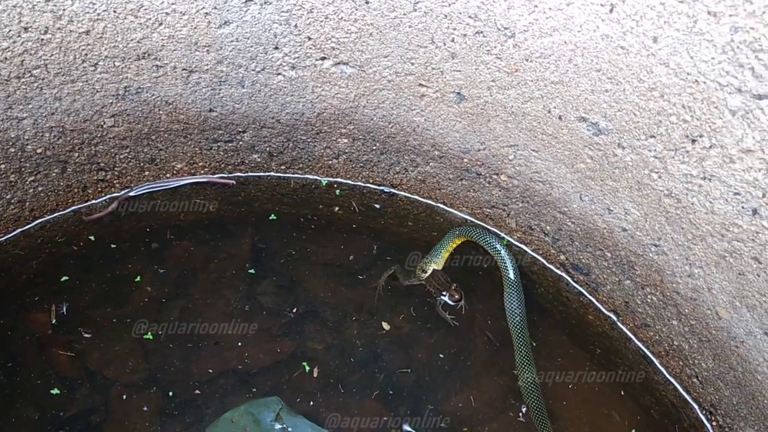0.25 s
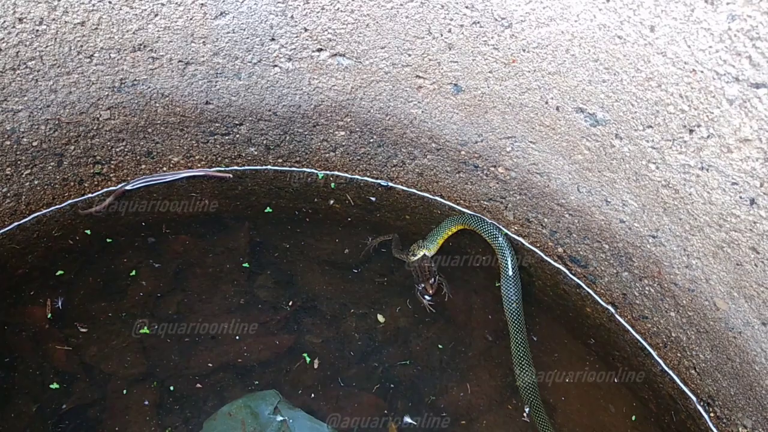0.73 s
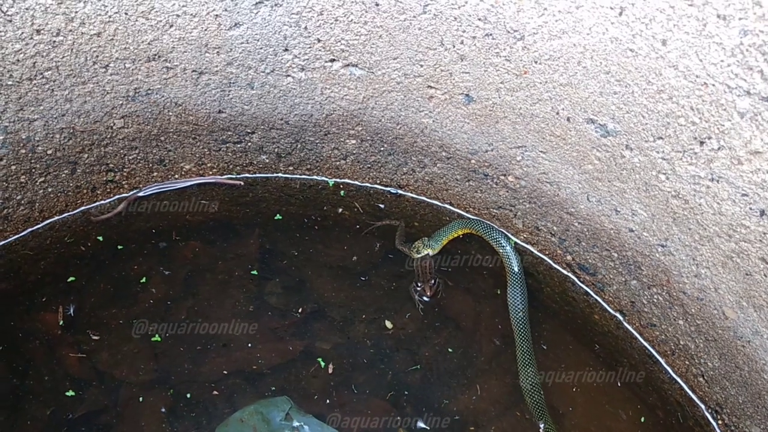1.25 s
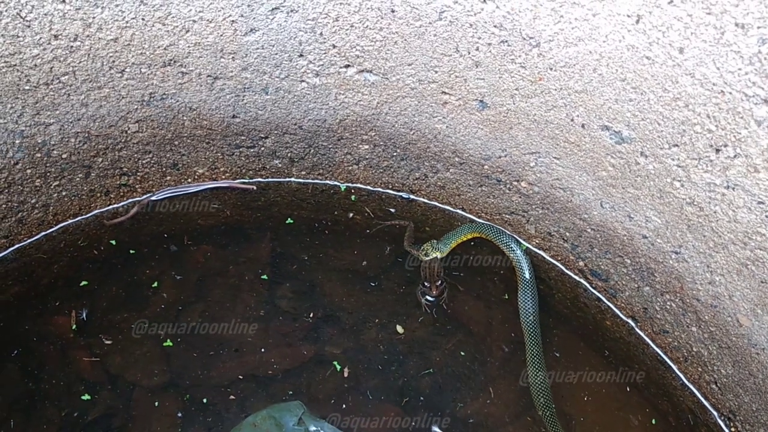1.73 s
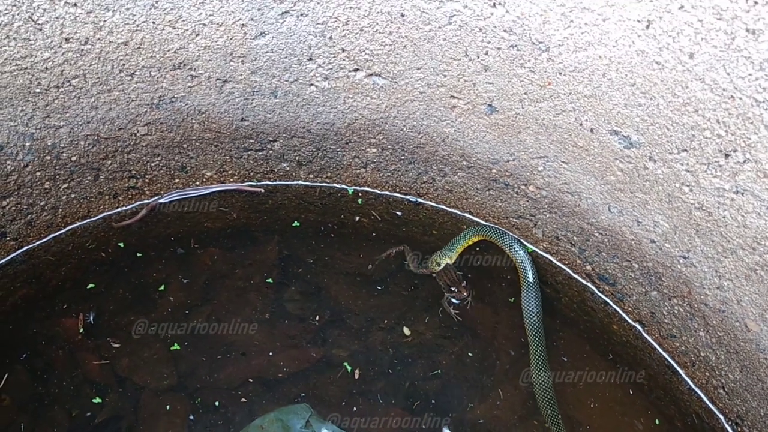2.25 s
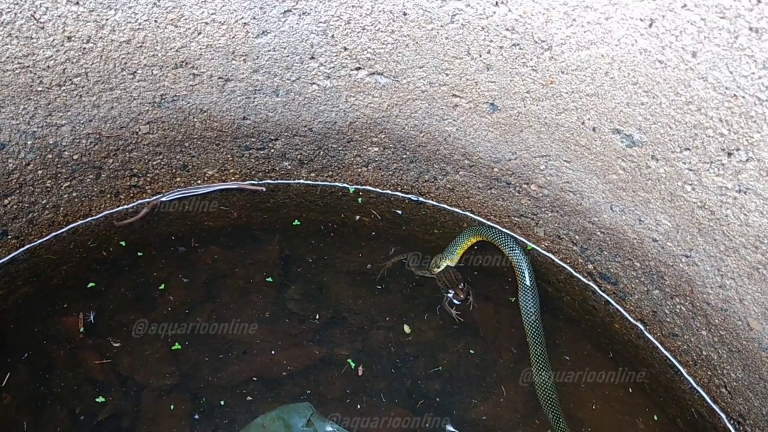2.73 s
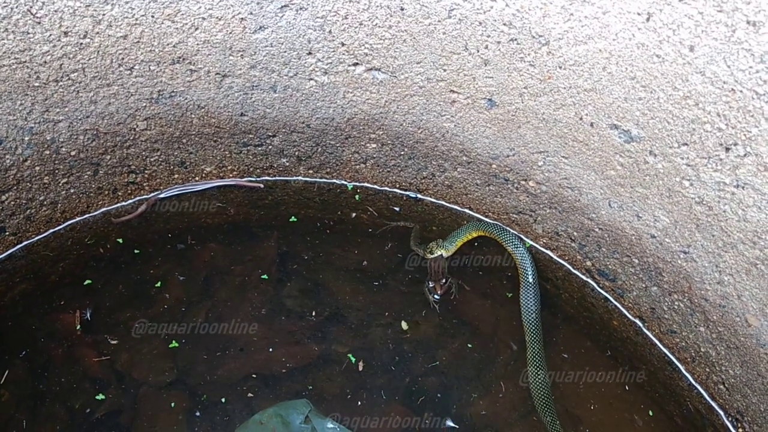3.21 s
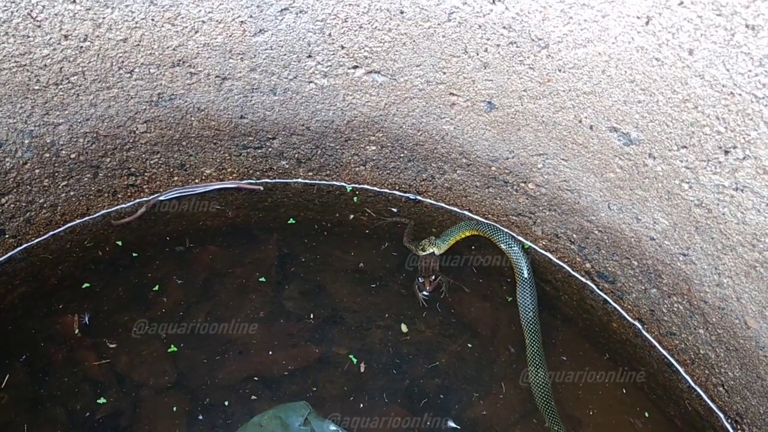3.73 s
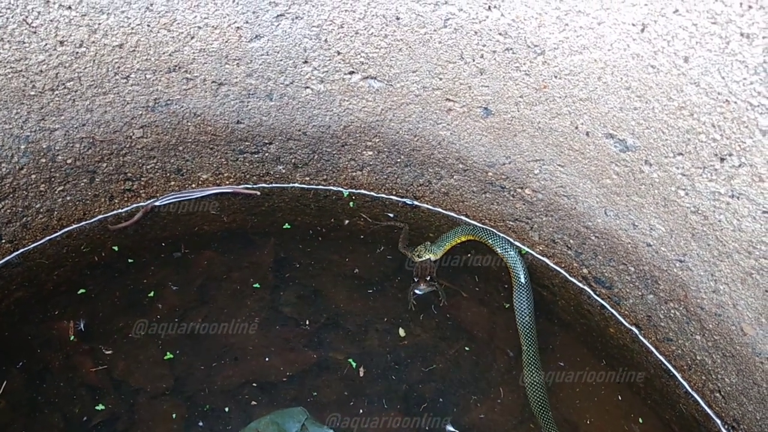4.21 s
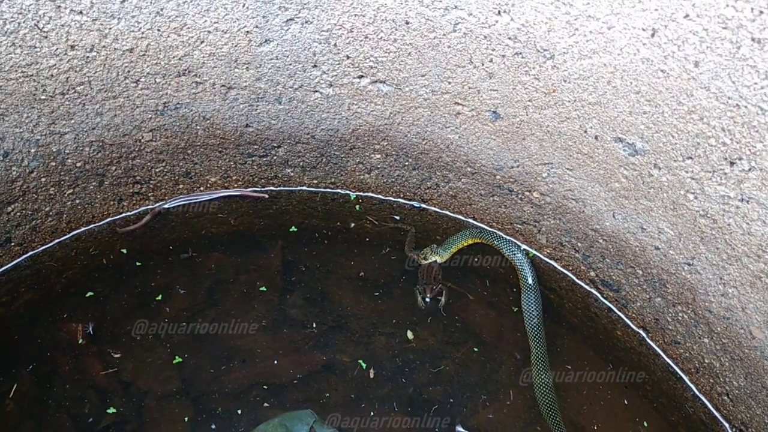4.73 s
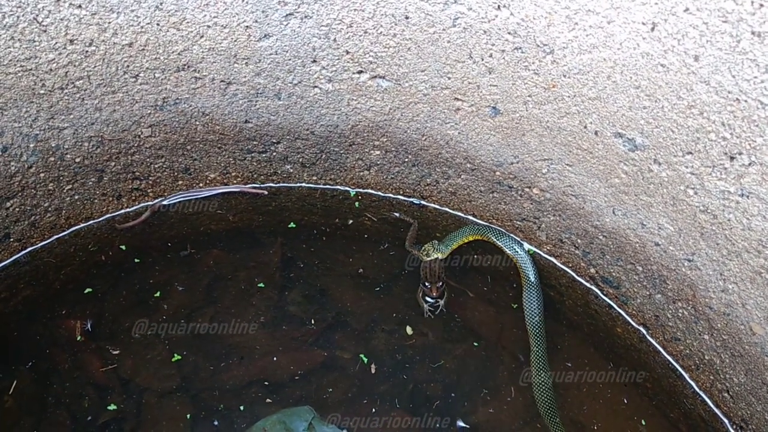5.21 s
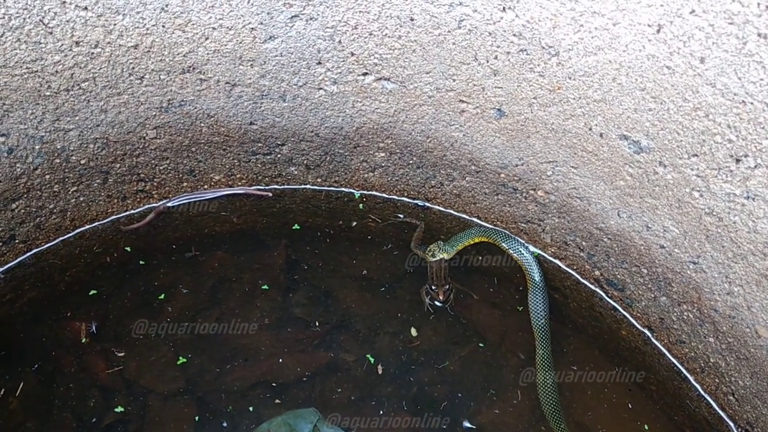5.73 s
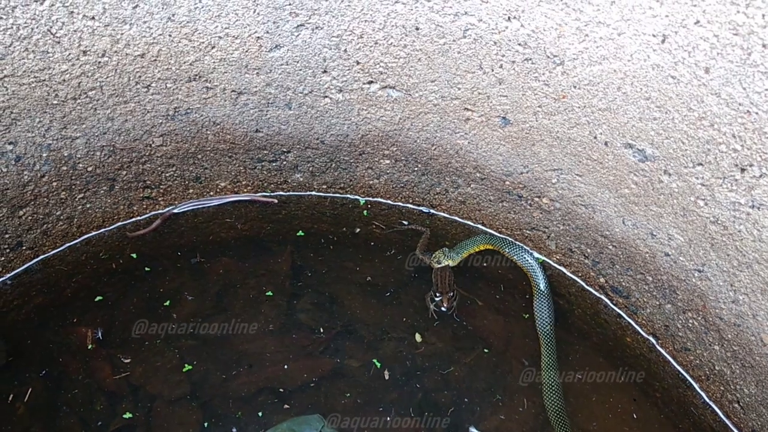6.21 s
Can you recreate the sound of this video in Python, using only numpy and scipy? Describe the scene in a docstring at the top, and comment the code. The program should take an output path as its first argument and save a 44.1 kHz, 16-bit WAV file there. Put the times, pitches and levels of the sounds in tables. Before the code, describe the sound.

Over a faint distant engine drone and hollow air, a frog squeals briefly three times, each raspy yelp echoing off a round tank wall.

```python
"""A distant engine drones low from the start: a wavering tone and its octave over uneven rumble noise.
Hollow outdoor air, coloured noise that keeps a round concrete water tank faintly ringing, and a hiss join it.
Just before the first cry come faint wet rustles, swells of fine noise, and gliding sine chirps; both recur.
A frog held by a snake then cries three times: each starts as a rasp, clears into a short arched note and falls.
The cries are summed harmonics and puffs of noise; the tank's standing waves ring on after each."""
import sys
import numpy as np
from scipy import signal
from scipy.fft import rfft, irfft
from scipy.io import wavfile
from scipy.ndimage import uniform_filter1d

SR = 44100
rng = np.random.default_rng(int(sys.argv[2]) if len(sys.argv) > 2 else 0)


def to_wav(sig):
    """Store sig (one row per channel, or 1-D mono) as 16-bit WAV at the path in sys.argv[1].

    Samples outside -1..1 are clipped; the rate is SR.
    """
    pcm = np.clip(np.atleast_2d(sig), -1, 1) * 32767
    pcm = np.round(pcm).astype(np.int16)
    wavfile.write(sys.argv[1], SR, pcm.T)  # frames by channels


N = 284886
TIME = np.arange(N) / SR

# engine tone over time: (t/s, level/dB)
TONE_LEVEL = [(0.0, -47), (2.27, -50.5), (2.34, -40.5), (2.41, -64), (2.5, -43), (2.82, -80), (3.07, -42),
              (3.15, -63), (3.36, -40.5), (3.45, -47), (4.5, -46), (4.55, -69), (4.6, -48.5), (5.13, -40.5),
              (5.2, -62), (5.33, -42.5), (6.24, -42.5), (6.46, -55)]
# engine rumble over time, before its overall lift: (t/s, level/dB)
RUMBLE_LEVEL = [(0.0, -47), (0.2, -45.5), (0.32, -63), (0.49, -51.5), (2.3, -53), (2.36, -46.5),
                (2.66, -54), (5.96, -55), (6.42, -48.5), (6.46, -51)]
# relative colour of the rumble: (f/Hz, level/dB)
RUMBLE_COLOUR = [(20, -18), (32, -11), (45, -22), (58, -7.5), (69, 10), (78, -7.5), (95, 6), (110, -43),
                 (140, -48)]
# relative colour of outdoor air made hollow by the tank: (f/Hz, left level/dB, right level/dB)
AIR_COLOUR = [(117, -74, -77), (151, -90.5, -82.5), (163.5, -71, -75.5), (185, -88.5, -82),
              (273.5, -74.5, -74.5), (398, -91, -85), (436, -101, -87), (629, -78.5, -87.5),
              (711, -102, -106), (779, -88, -89), (915, -103, -100), (995, -87, -83.5), (1005, -92, -93),
              (1250, -94, -91.5), (2670, -94.5, -99)]
# relative colour of the high hiss, also worn by the rustles: (f/Hz, level/dB)
HISS_COLOUR = [(1470, -15), (2500, -9), (3470, -8), (5660, -6), (7200, -2.5), (8550, 2.5), (10200, -5),
               (12500, -10), (15500, -18)]
# background over time, before the hiss lift: (t/s, low air level/dB, midrange air level/dB, hiss level/dB)
BACKGROUND_LEVELS = [(0, -54.5, -54, -54), (.66, -55, -55.5, -55.5), (1.2, -54.5, -53.5, -54.5),
                     (2.1, -57, -53, -53.5), (2.45, -55.5, -52.5, -55), (2.9, -55, -56.5, -55.5),
                     (3.35, -57.5, -57, -56), (4.45, -55, -57.5, -56.5), (4.849, -57, -57, -55.5),
                     (5.7, -56.5, -56, -57), (6.46, -55, -58, -57.5)]
# width of the noises: (f/Hz, side minus mid level/dB)
STEREO_WIDTH = [(60, -49), (110, -25), (200, -20), (380, -3.5), (700, -3.5), (1290, 2), (5000, -1),
                (8100, 1), (10500, -18.5), (13000, -39)]
# standing waves of the tank: (f/Hz, time to fall 60 dB t60/s, left level/dB, right level/dB)
TANK_MODES = [(435, .35, 0, 10), (544, .46, 20.5, 1), (592, .42, 9, 15.5), (754, .45, 1, 3),
              (807, .3, 5, 5), (942, .4, 3, 3), (1030, .4, 5, 0), (1198, .55, 6, 2), (1302, .9, 4, 5),
              (1427, .5, 16, 9), (1474, .55, 9, 15), (1589, .55, 4, 14), (1642, .42, 17.5, 14.5),
              (1776, .7, 6, 15), (1845, .6, 14, 4), (1867, .62, 15, 7), (1956, .75, 6, 12)]
# the curved wall favours one ear or the other: (f/Hz, left minus right level/dB)
WALL_BALANCE = [(450, -15), (630, 9), (950, -6), (1250, -9), (1900, 7), (2450, -2), (3100, 4)]
# wet rustles of the struggle: (centre t/s, swell length t/s, level/dB, centre f/Hz)
RUSTLES = [(0.957, 0.015, -52, 8670), (1.778, .007, -51, 12000), (2.239, 0.0084, -46, 10100),
           (3.027, 0.056, -52, 8550), (3.182, 0.013, -49, 6500), (3.242, 0.025, -44.5, 9500),
           (3.967, 0.01, -54, 8440), (4.149, 0.0043, -52, 14000), (4.897, .019, -56, 12500),
           (5.09, 0.01, -56, 9530), (5.518, 0.0087, -50.5, 4300), (5.527, .0012, -40.5, 5900),
           (5.835, .015, -56, 10500)]
# faint chirps, before the tank: (centre t/s, level/dB, centre f/Hz)
CHIRPS = [(.968, -57, 2400), (1.897, -64, 1900), (1.99, -63, 2570)]
# cries, before the tank: (peak t/s, rise t/s, fall t/s, top pitch f/Hz, peak level/dB,
#   least roughness 0-1, pitch climb t/s, air in the rasp level/dB,
#   mouth resonance f/Hz, its lift level/dB, treble level/dB)
CRIES = [(1.128, .145, 0.049, 654, -35.5, 0, .078, -2.5, 1870, 6, -3),
         (3.041, .135, .055, 635, -36, 0, .068, 6.5, 1600, 5.5, -2),
         (5.835, .16, .048, 620, -37.3, 0.21, .082, -1, 1910, 5, 1.5)]
# throat and open mouth in the clear note, relative: (f/Hz, level/dB)
THROAT = [(300, -43), (480, 11), (560, 8.5), (640, 10.5), (900, -3), (1150, 2.5), (1300, 1), (1650, -4.5),
          (1940, -7.5), (2200, -13), (2480, -7.5), (2850, -21), (3100, -12), (3800, -25), (4600, -15.5),
          (7000, -58), (9500, -40), (10900, -26), (12000, -48)]
# thinner colour of the rasp, relative: (f/Hz, level/dB)
RASP_COLOUR = [(250, -57), (450, 2), (600, 11.5), (800, 5), (1050, 5.5), (1600, -1.5), (2050, -15),
               (2450, 0.5), (2800, -12), (3300, -10), (4500, -17), (9000, -41)]

DRONE_HZ, DRONE_DRIFT_HZ = 85.3, 1.66  # the engine's mean pitch and its slow drift
CHIRP_LENGTH_S, CHIRP_FALL_HZ_PER_S = .011, 3000
ONSET_HZ, SLACK_HZ = 466.9, 448  # pitch as the folds start to move; pitch with no pressure behind them
SAG_SHARE, SAG_CURVE = .68, 2.99  # effort gives way at this share of the fall, and this steeply
SWELL_POWER, RELEASE_DB = 1.13, -8.5  # loudness is a power of the rise; level change by the end
LOCK_START, LOCK_END = 0.2, 0.88  # squared efforts between which the rasp clears into a note
END_ROUGH, RASP_DB = 0.81, -3  # roughness that returns in the fall; rasp against note
MOUTH_WIDTH_HZ, BREATH_DB = 69, -29  # spread of the mouth's resonance; air in the note
TOP_HZ = 15550


def undb(db):
    """Decibels to gain."""
    return 10 ** (np.asarray(db) / 20)


def unit(x):
    """Scale to rms 1."""
    return x / np.sqrt(np.mean(x ** 2))


def gain_at(hz, points):
    """Gain of a (f/Hz, level/dB) spectrum, joined on a log-frequency axis."""
    f, db = np.transpose(points)
    return undb(np.interp(np.log(hz + 1), np.log(f), db))


def colour(x, points):
    """Filter by a (f/Hz, level/dB) spectrum."""
    n = x.shape[-1]
    return irfft(rfft(x) * gain_at(np.fft.rfftfreq(n, 1 / SR), points), n)


def band(x, lo_hz, hi_hz, order=2):
    """Band-pass filter."""
    edges = [lo_hz, min(hi_hz, SR / 2 - 1000)]
    return signal.sosfilt(signal.butter(order, edges, "band", fs=SR, output="sos"), x)


def walk(rate, n):
    """Smooth random wander: about `rate` new targets a second, rms 1."""
    k = max(int(SR / rate), 1)
    steps = np.repeat(rng.standard_normal(n // k + 1), k)
    return unit(uniform_filter1d(steps, k)[:n])


def widen(pair):
    """Two unrelated noises become left and right, alike in the bass and the top and wide in the middle."""
    mid, side = pair[0], colour(pair[1], STEREO_WIDTH)
    return np.array([mid + side, mid - side])


def stereo_noise(left, right):
    """Noise with a (f/Hz, level/dB) colour for each ear."""
    ears = widen(rng.standard_normal((2, N)))
    return unit(np.array([colour(ears[0], left), colour(ears[1], right)]))


def drone(waver_hz=2.56, rumble_db=4.5, octave_db=-26, throb_db=2):
    """A distant engine: a wavering low tone and its octave over an uneven rumble."""
    tone_db = np.interp(TIME, *np.transpose(TONE_LEVEL))
    under_db = np.interp(TIME, *np.transpose(RUMBLE_LEVEL)) + rumble_db
    hz = DRONE_HZ + DRONE_DRIFT_HZ * walk(2.3, N) + waver_hz * walk(15, N)
    phase = 2 * np.pi * np.cumsum(hz) / SR
    hum = unit(np.sin(phase) + undb(octave_db) * np.sin(2 * phase))
    rumble = stereo_noise(RUMBLE_COLOUR, RUMBLE_COLOUR)
    # the rumble beats quickly but holds its strength over longer spans
    rumble /= np.sqrt(uniform_filter1d(rumble[0] ** 2, size=9000))
    return hum * undb(tone_db + throb_db * walk(9, N)) + rumble * undb(under_db)


def tank(x, scatter_db=-0.5, scatter_t60=0.14, low_scatter_db=-6, lag_s=0.00014):
    """Direct sound, a quick scatter off wall and water, and the long ring of the standing waves."""
    t = TIME[:SR]
    ring = np.zeros((2, SR))
    for hz, t60, left_db, right_db in TANK_MODES:
        decay = np.log(1000) / t60
        # scaled so the level is the gain at resonance, however long the ring
        mode = 2 * decay / SR * np.exp(-decay * t)
        swing = np.array([np.sin(2 * np.pi * hz * t), np.cos(2 * np.pi * hz * t)])
        ring += undb([[left_db], [right_db]]) * mode * swing
    # the first reflection needs a few milliseconds to come back; short waves scatter most
    fade = np.exp(-np.log(1000) * t / scatter_t60) * (t > .003)
    scatter = rng.standard_normal((2, SR)) * fade
    scatter = colour(unit(scatter), [(650, low_scatter_db), (1100, 0)])
    response = ring + undb(scatter_db) * scatter / np.sqrt(SR)
    # the source sits a little to the right, so the left ear hears it later
    hz, balance = np.transpose(WALL_BALANCE)
    left = colour(x, np.c_[hz, balance / 2])
    right = colour(x, np.c_[hz, -balance / 2])
    direct = np.array([np.interp(TIME - lag_s, TIME, left), right])
    return direct + signal.fftconvolve(x[None], response, axes=1)[:, :N]


def background(ring_db=-17, hiss_db=3.0, flicker_db=0.82, brighten=1.0):
    """Soft outdoor air keeps the tank faintly ringing; a flickering high hiss brightens as it grows."""
    s, *columns = np.transpose(BACKGROUND_LEVELS)
    low_db, mid_db, high_db = (np.interp(TIME, s, c) for c in columns)
    hz, left, right = np.transpose(AIR_COLOUR)
    air = unit(band(stereo_noise(np.c_[hz, left], np.c_[hz, right]), 51, 3350))
    low = colour(air, [(350, -2), (550, -43)])
    ring = unit(tank(band(rng.standard_normal(N), 230, 3600)))
    middle = air - low + undb(ring_db) * ring
    hiss = stereo_noise(HISS_COLOUR, HISS_COLOUR)
    top = colour(hiss, [(8500, -10), (11500, 1)])
    hiss = hiss + top * (undb(brighten * (high_db - high_db.mean())) - 1)
    hiss_gain = undb(high_db + hiss_db + flicker_db * walk(24.94, N))
    return low * undb(low_db) + middle * undb(mid_db) + hiss * hiss_gain


def rustles(grain_db=1.5, spread=1.32):
    """Short swells of fine crackle as the animals shift against the wet wall."""
    out = np.zeros((2, N))
    for s, length, db, hz in RUSTLES:
        near = np.abs(TIME - s) < 4 * length + .01
        t = TIME[near]
        noise = widen(rng.standard_normal((2, len(t))))
        grains = colour(noise * undb(grain_db * walk(400, len(t))), HISS_COLOUR)
        grains = unit(band(grains, hz / spread, hz * spread, order=1))
        out[:, near] += grains * undb(db) * np.exp(-((t - s) / length) ** 2 / 2)
    return out


def chirp(s, db, hz):
    """A faint falling whistle, perhaps a far bird: a gliding sine under a bell-shaped swell."""
    t = TIME - s
    phase = 2 * np.pi * (hz * t - CHIRP_FALL_HZ_PER_S * t ** 2 / 2)
    return np.sin(phase) * undb(db) * np.exp(-(t / CHIRP_LENGTH_S) ** 2 / 2)


def squeeze(t, rise, fall, top_hz, top_db, peak_rough, climb):
    """One push of air: effort arches up and drops fast; pitch follows it, and the rasp clears near the top."""
    up = np.clip(1 + t / rise, 1e-3, 1)
    down = np.clip(t / fall, 0, 1)
    effort = np.exp(-(np.minimum(t, 0) / climb) ** 2 - (down / SAG_SHARE) ** SAG_CURVE)
    rest_hz = np.where(t < 0, ONSET_HZ, SLACK_HZ)
    hz = rest_hz + (top_hz - rest_hz) * np.where(t < 0, effort ** 2, effort)
    db = top_db + 20 * np.log10(up) * SWELL_POWER + RELEASE_DB * down ** 2
    clearing = (LOCK_END - effort ** 2) / (LOCK_END - LOCK_START)
    unlocked = np.where(t < 0, clearing, END_ROUGH * down ** 2)
    return hz, db, np.clip(np.maximum(unlocked, peak_rough), 0, 1)


def cry(peak, rise, fall, top_hz, top_db, peak_rough, climb, puff_db, mouth_hz, mouth_db, treble_db,
        jitter=0.0343, quaver=0.0074, shimmer=0.27, open_hz=560, count=24):
    """Vocal folds rattle irregularly at low pressure and lock into a clearer note at the peak."""
    inside = (TIME >= peak - rise) & (TIME <= peak + fall)
    t = TIME[inside] - peak
    hz, db, rough = squeeze(t, rise, fall, top_hz, top_db, peak_rough, climb)
    unsteady_hz = hz * (1 + (quaver + jitter * rough) * walk(327, len(t)))
    phase = 2 * np.pi * np.cumsum(unsteady_hz) / SR
    k = np.arange(1, count + 1)[:, None]
    # the mouth gapes wide by the peak and favours the harmonic that crosses its resonance
    gape = np.clip(1 + t / fall, 0, 1)
    mouth = undb(mouth_db * gape * np.exp(-((k * hz - mouth_hz) / MOUTH_WIDTH_HZ) ** 2))
    note = unit(np.sum(gain_at(k * hz, THROAT) * mouth * np.sin(k * phase), axis=0))
    breath = band(rng.standard_normal(len(t)) * (1 + np.cos(phase)), 1080, 1550)
    note += undb(BREATH_DB) * unit(breath)
    # slack folds close only twice in three cycles, which puts lines between the harmonics
    slack = 2 / 3
    # the opening mouth lifts its resonances with the pitch, so each line keeps its strength
    lines = gain_at(k * slack * open_hz, RASP_COLOUR) * np.sin(k * slack * phase)
    rattle = unit(np.sum(lines, axis=0))
    # air escapes in a puff each time the folds part
    puffs = unit(colour(rng.standard_normal(len(t)) * (1 + np.cos(phase)), RASP_COLOUR))
    rasp = rattle + undb(puff_db) * puffs
    # steady pressure keeps the rasp dense and even, with a shimmer on top
    rasp *= (1 + shimmer * walk(189.5, len(t))) / np.sqrt(uniform_filter1d(rasp ** 2, size=300))
    voice = (1 - rough) * note + rough * undb(RASP_DB) * rasp
    voice *= undb(db) * signal.windows.tukey(len(t), .06)
    out = np.zeros(N)
    out[inside] = colour(voice, [(2500, 0), (3000, treble_db)])
    return out


def scene():
    """The frog and a few faint chirps sound in the tank, with the drone, background and rustles around them."""
    voices = sum(chirp(*row) for row in CHIRPS) + sum(cry(*row) for row in CRIES)
    return drone() + background() + rustles() + tank(voices)


def record(dry):
    """A steep low-pass cuts the top."""
    return signal.sosfilt(signal.ellip(10, .1, 80, TOP_HZ, fs=SR, output="sos"), dry)


dry = scene()
out = record(dry)
to_wav(out)
```